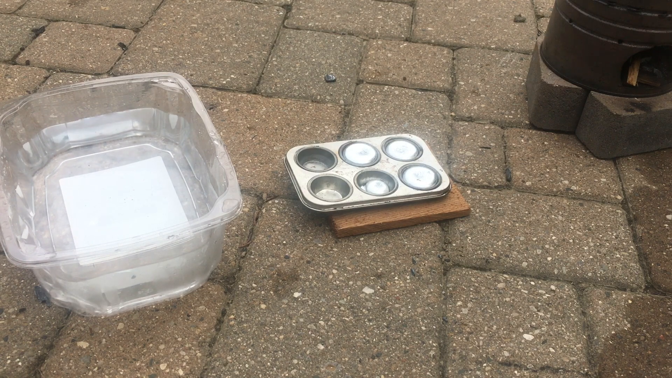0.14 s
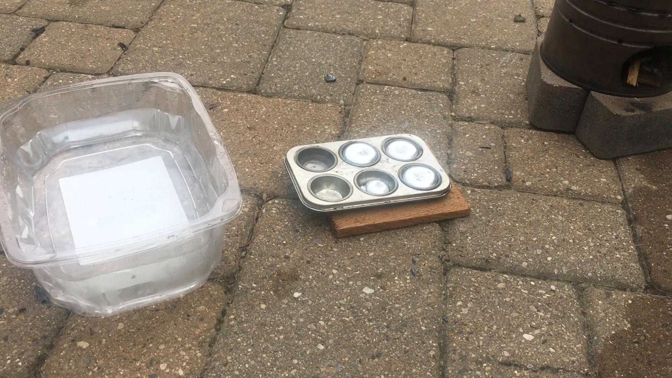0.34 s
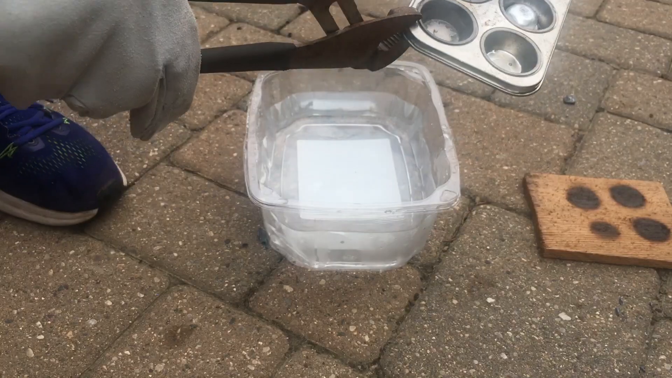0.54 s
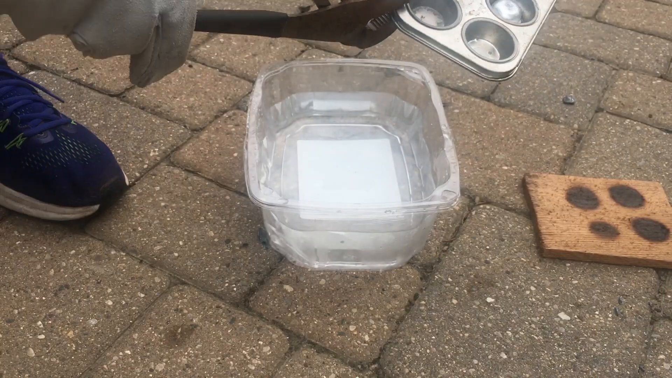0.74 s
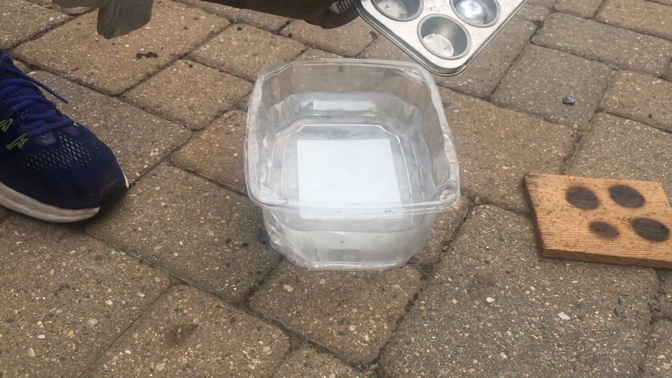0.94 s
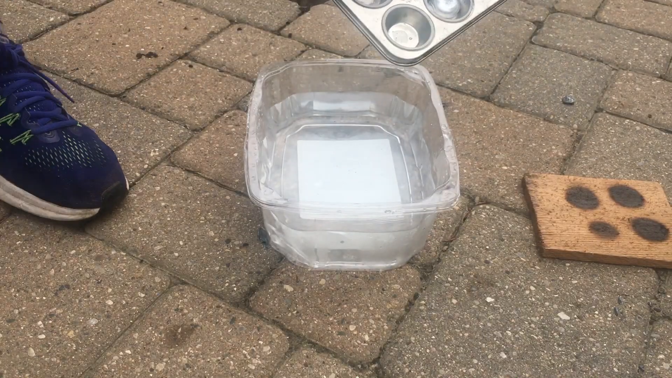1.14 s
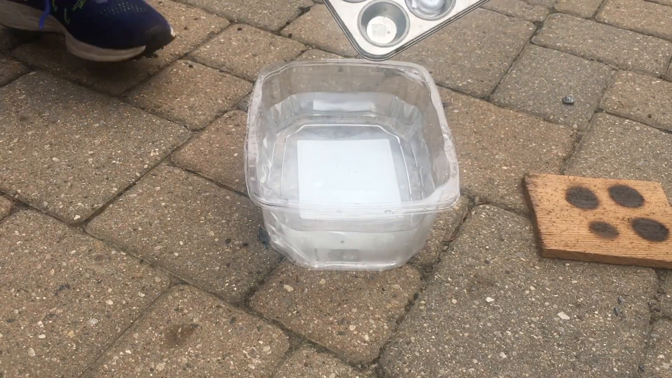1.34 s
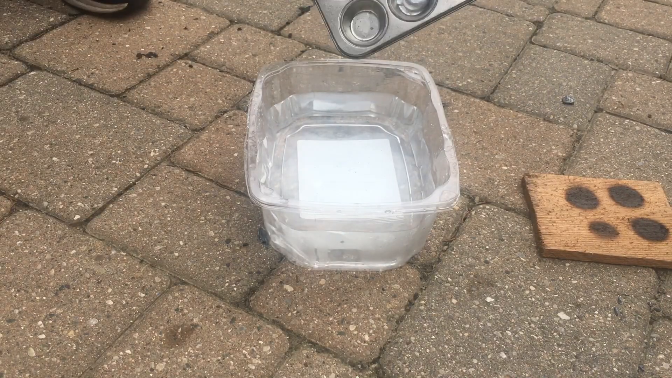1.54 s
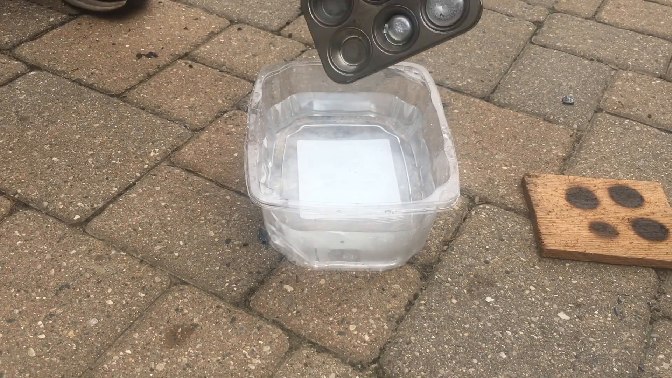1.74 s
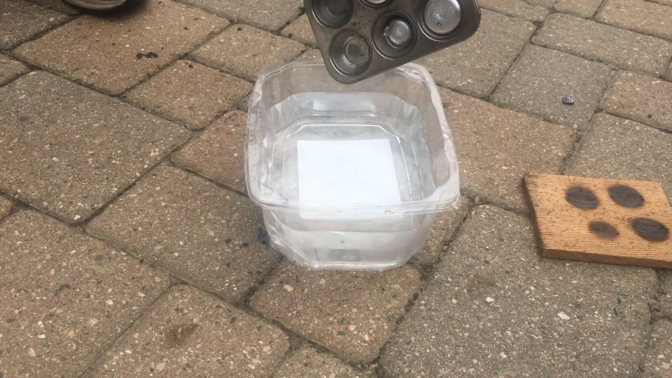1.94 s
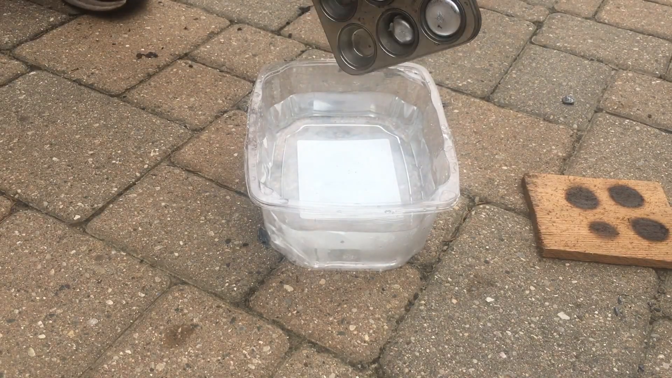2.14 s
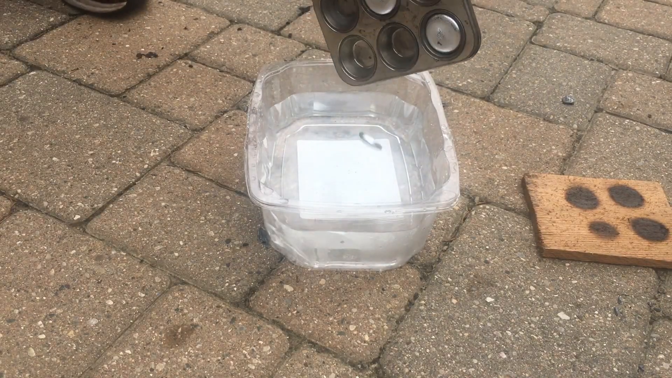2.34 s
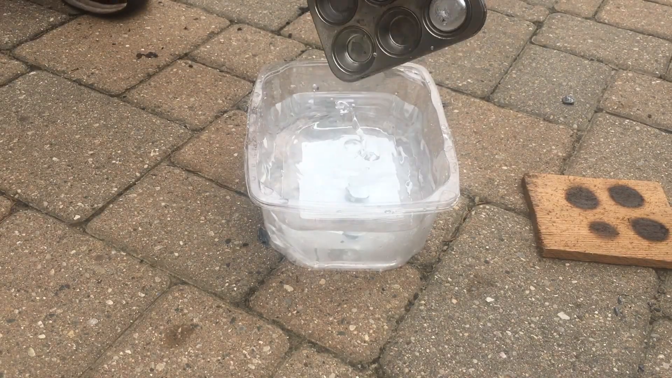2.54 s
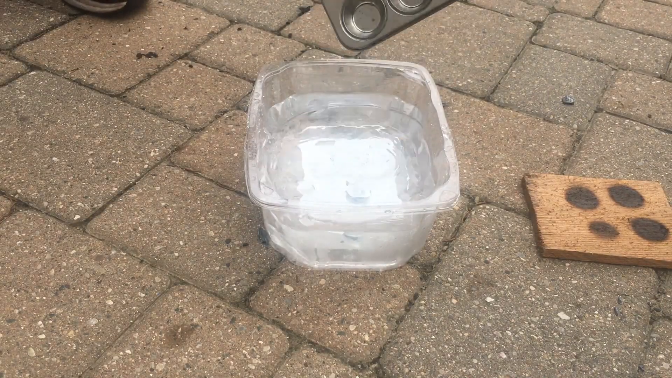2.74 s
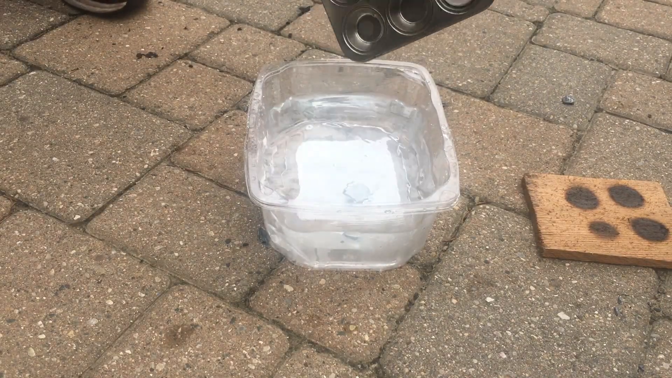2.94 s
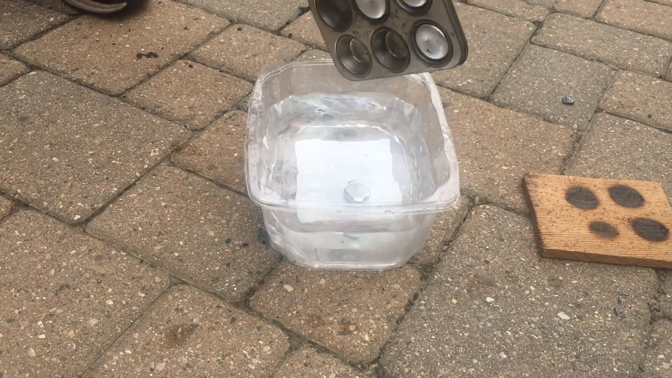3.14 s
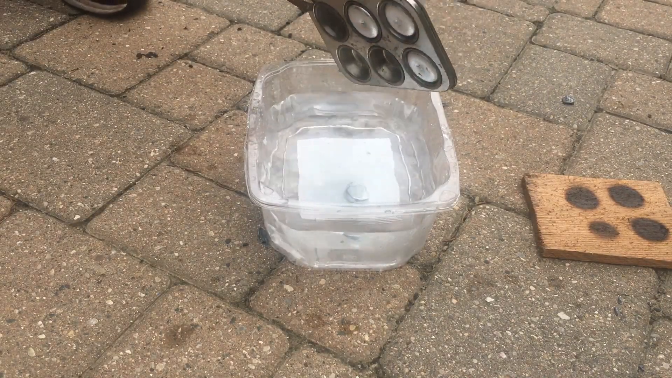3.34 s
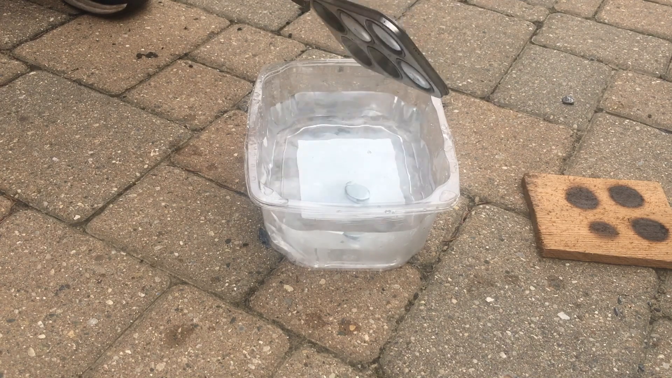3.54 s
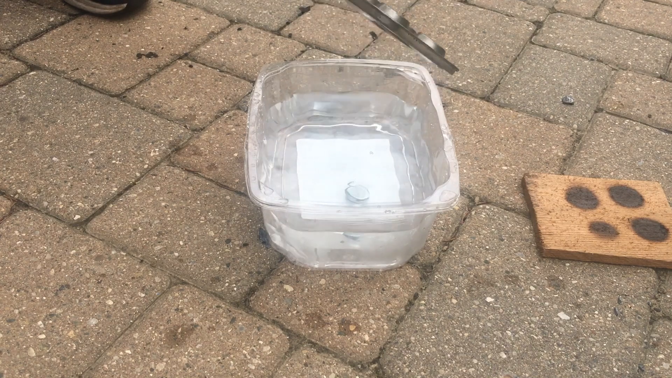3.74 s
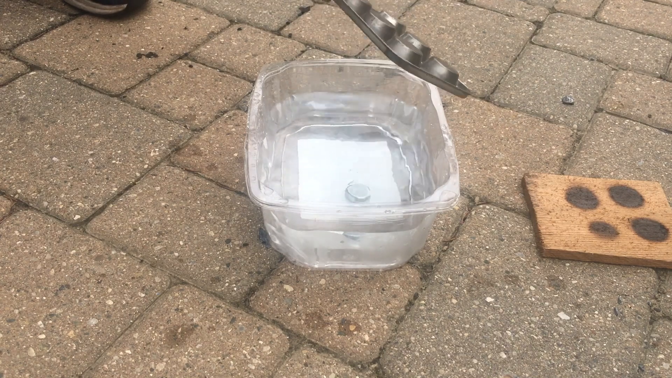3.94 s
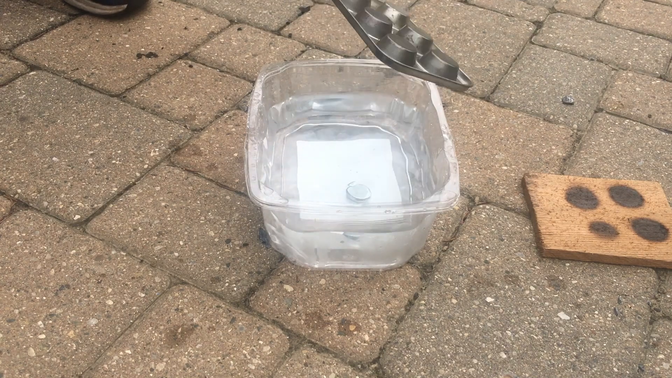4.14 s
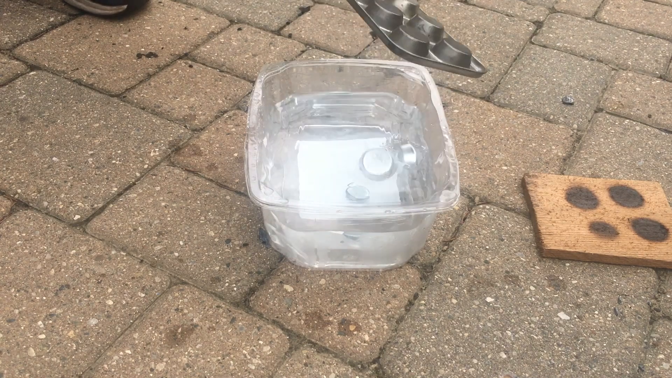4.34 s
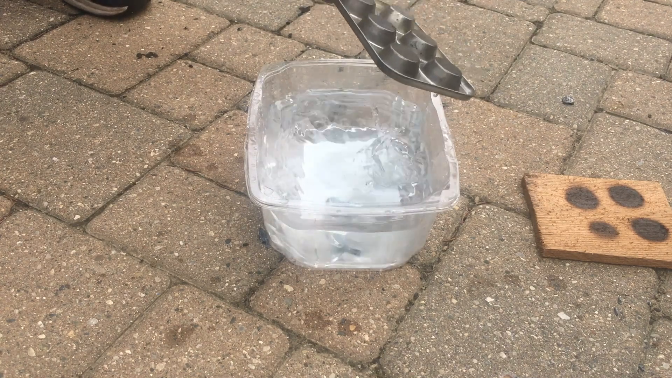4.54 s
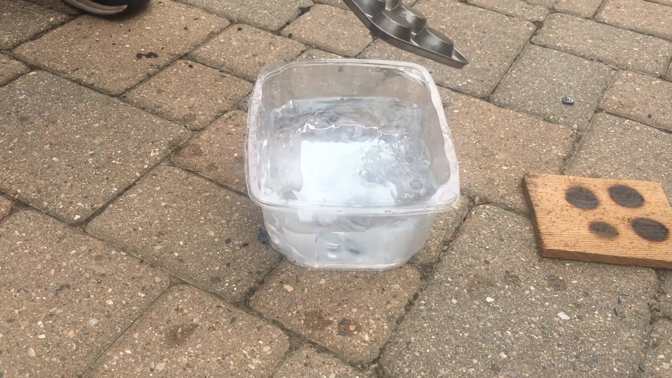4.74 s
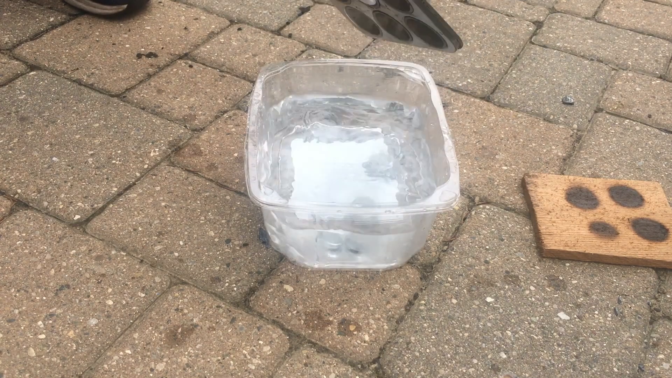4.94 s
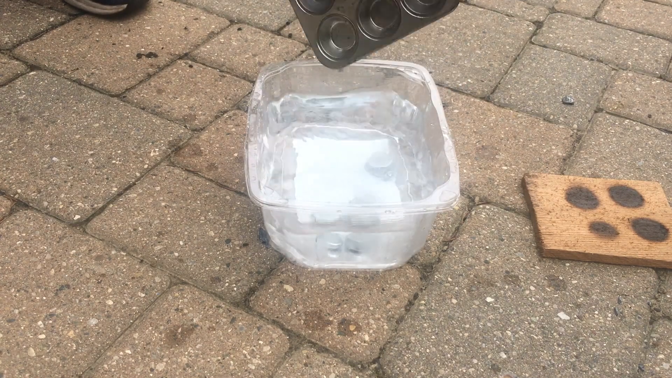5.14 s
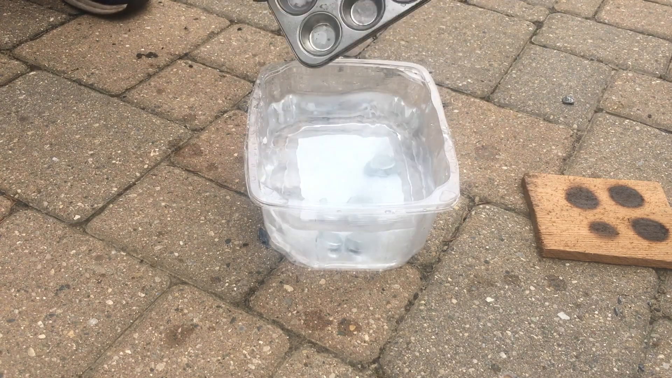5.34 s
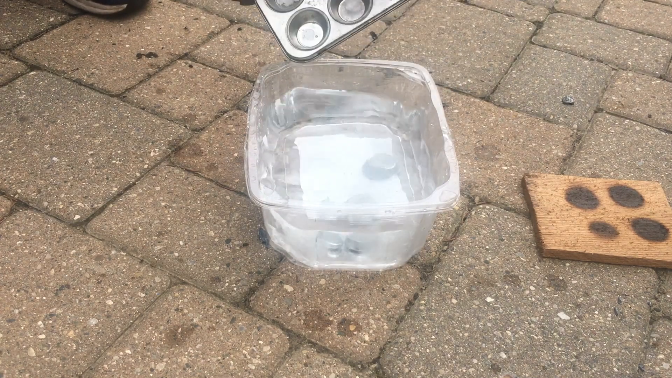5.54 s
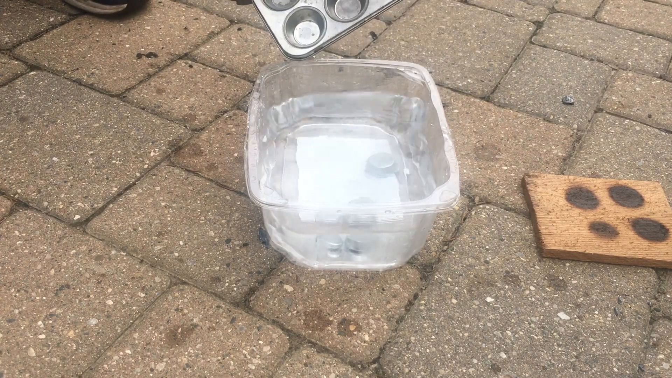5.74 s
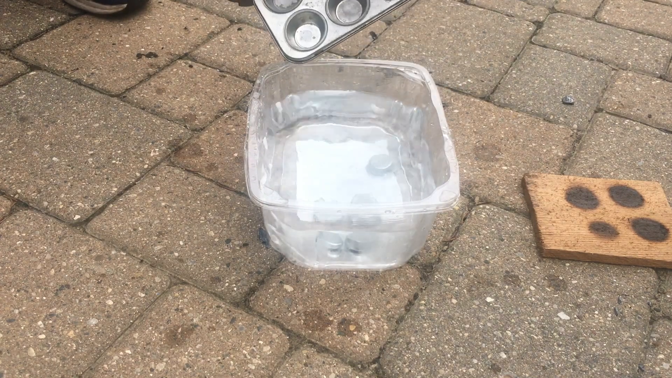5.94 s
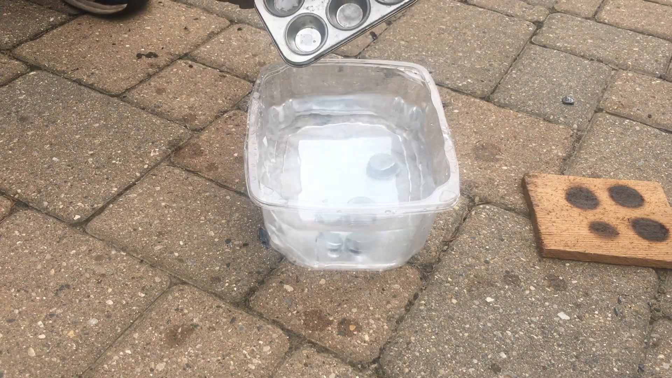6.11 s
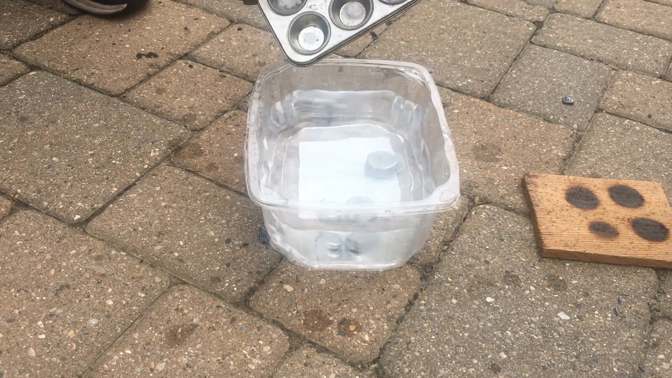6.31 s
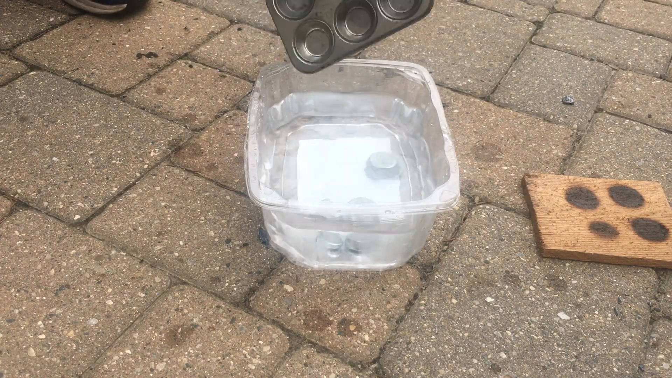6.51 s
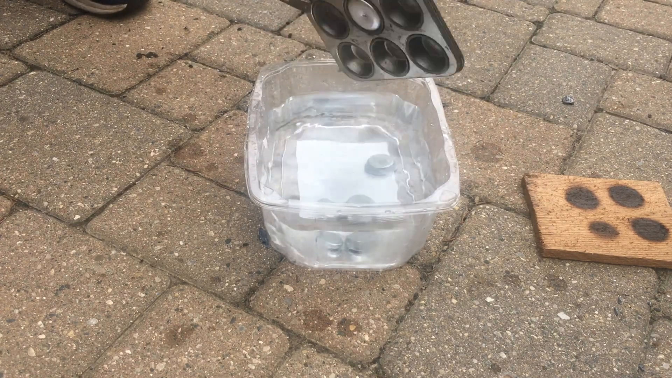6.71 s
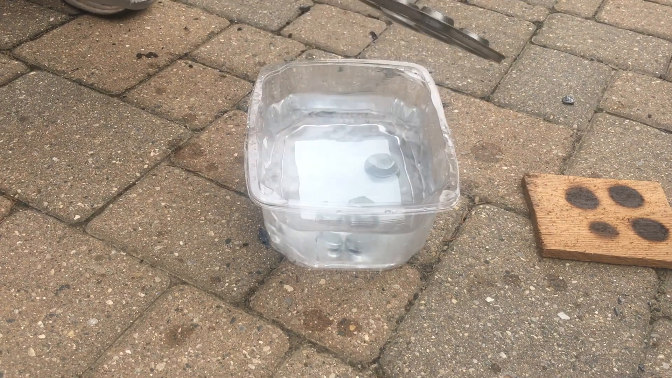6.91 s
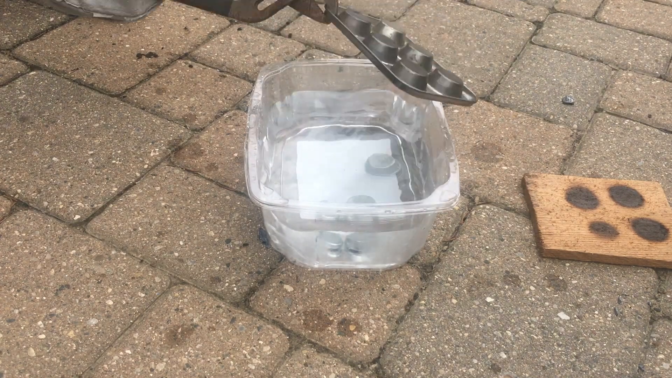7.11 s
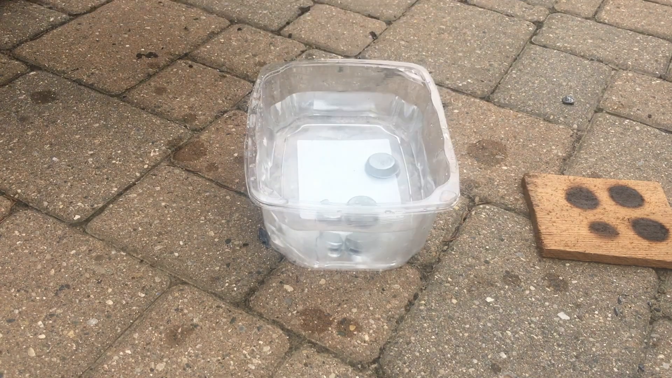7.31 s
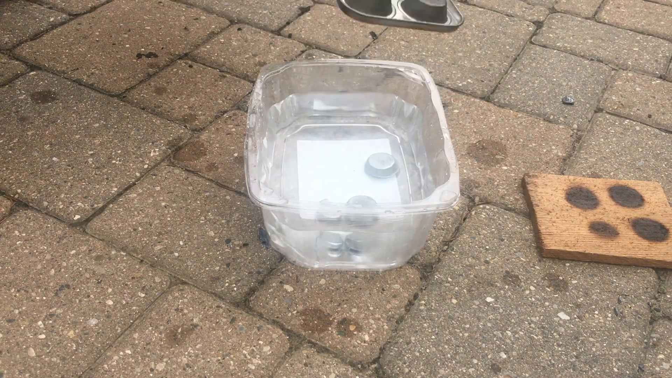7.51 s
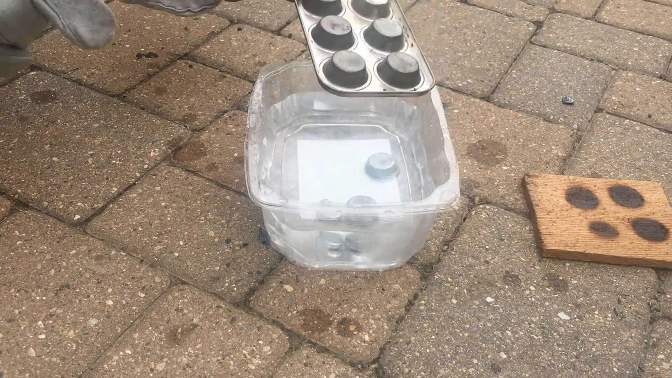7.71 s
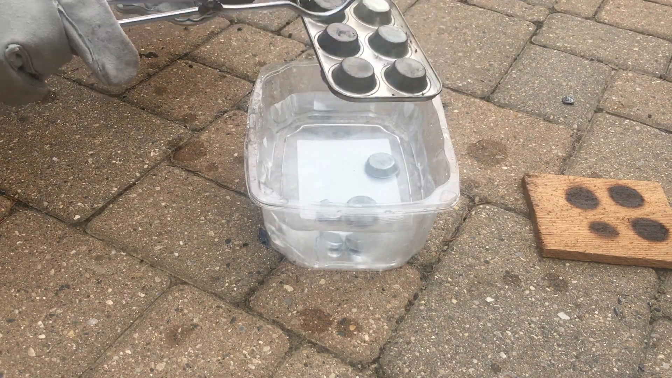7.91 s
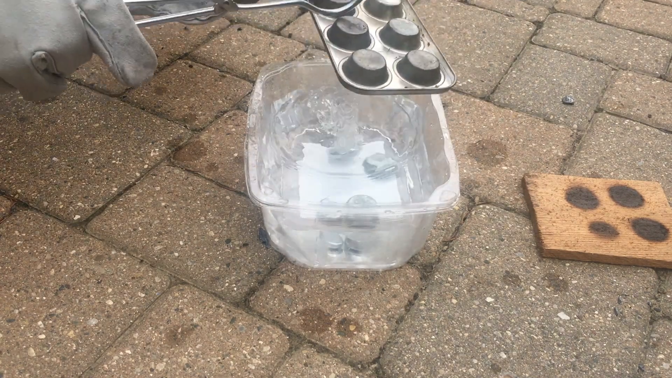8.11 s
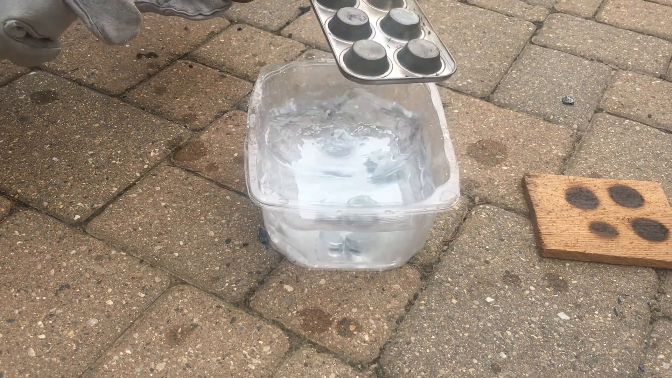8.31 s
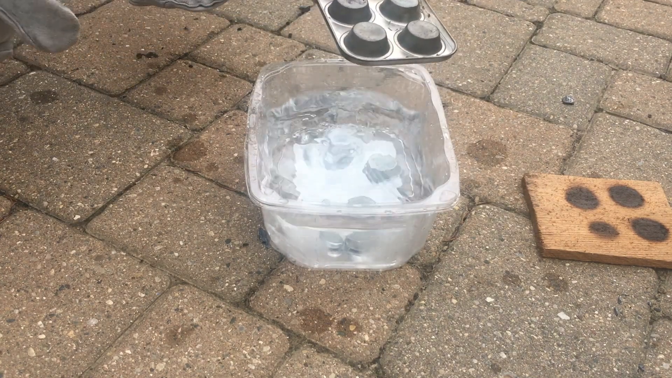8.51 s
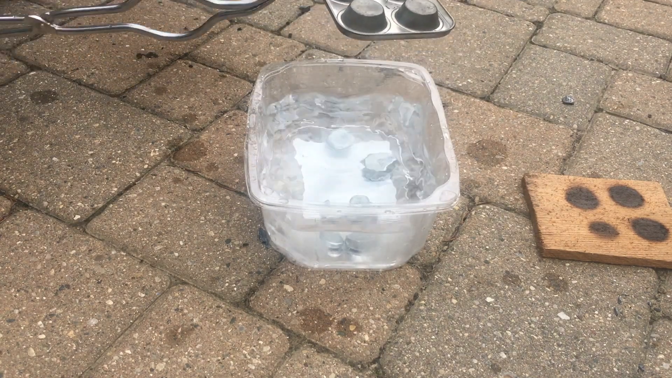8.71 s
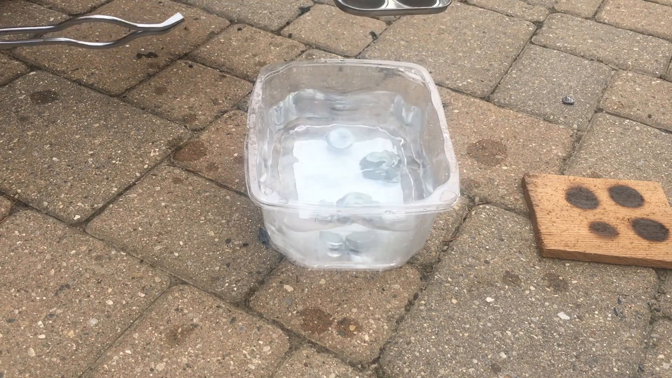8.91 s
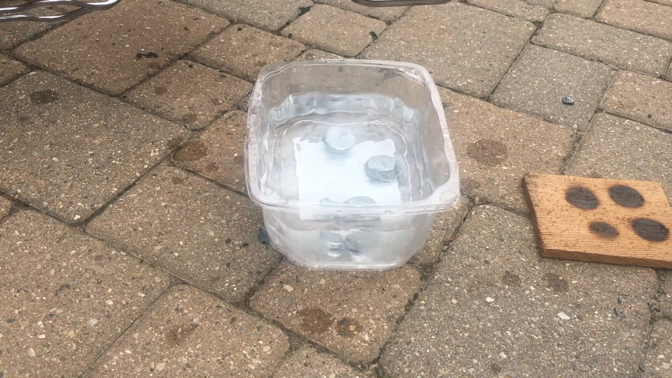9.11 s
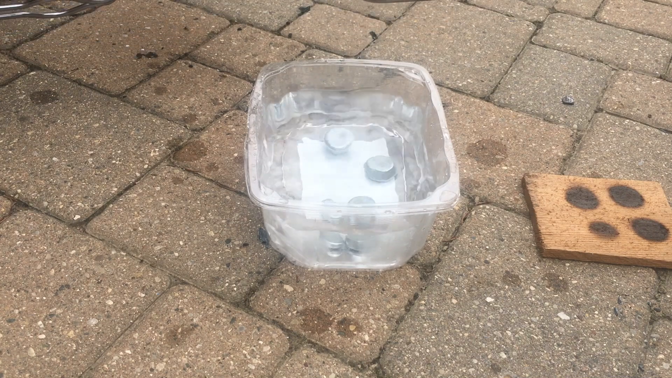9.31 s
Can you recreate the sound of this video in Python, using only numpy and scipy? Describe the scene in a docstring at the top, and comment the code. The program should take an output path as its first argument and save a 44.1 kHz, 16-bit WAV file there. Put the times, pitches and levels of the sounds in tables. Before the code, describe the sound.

Close outdoor sound on a paved patio, with low rumble slightly stronger for the first half second, a faint high insect shimmer and tiny bird chirps. Light scrape at 0.2 s, a faint tick at 0.8, metal clicks and rubs at 1.15-1.6. At 2.2 a thin scrape leads to a ringing pan clank at 2.35; an ingot meets water at 2.46 with a short hiss, two loud hollow pops, a small knock and drips until 2.9. Quiet follows. At 4.35 a cluster of pan knocks, then a sharper hiss at 4.43, strong pops and vigorous boiling, with raps up to 5.5 thinning into sputter that dies by 6.4. Pan knock at 6.63, then near quiet. A bright, loud clank at 7.95; at 8.1 a hiss, pop and hard clattering tub impact with plops and splash, then quickly fading fizz, small crackles around 9 and uneven ticking to about 9.46.

```python
"""Hot ingots into water

Three hot metal ingots are tipped out of a muffin pan into a plastic tub of water on a patio.
Slides and clanks are clicks and noise through pan modes; quench hiss is dense grains; pops are short decaying sines.
The second and third ingots go on boiling as random clicks rung through the tub or coloured bright.
Insects (narrow noise bands) and small bird notes (gliding sines) sound faintly over a low outdoor rumble."""
import sys
import numpy as np
from scipy import signal
from scipy.fft import rfft, irfft, next_fast_len
from scipy.io import wavfile

SR = 44100
rng = np.random.default_rng(int(sys.argv[2]) if len(sys.argv) > 2 else 0)


def to_wav(sig):
    """Store sig (one row per channel, or 1-D mono) as 16-bit WAV at the path in sys.argv[1].

    Samples outside -1..1 are clipped; the rate is SR.
    """
    pcm = np.clip(np.atleast_2d(sig), -1, 1) * 32767
    pcm = np.round(pcm).astype(np.int16)
    wavfile.write(sys.argv[1], SR, pcm.T)  # frames by channels


N = 417186
TIME = np.arange(N) / SR
SHORT = TIME[:SR // 4]  # time base of one short event, in seconds

# Dense, quickly damped part of a metal contact. Each row: frequency in Hz, relative level in dB.
CLANK_SPECTRUM = [(100, 7.5), (300, -12.5), (500, -5), (850, 0), (1400, 3.5), (2100, 0), (2900, -4),
                  (4000, -4), (5600, -8), (7700, -6.5), (10500, -14.5), (16000, -21)]
# Steam hiss, also the colour of splats and snaps. Each row: frequency in Hz, relative level in dB.
HISS_SPECTRUM = [(200, -6), (500, -10), (900, -3.5), (1300, -4), (2300, 4.5), (2800, -7), (3700, 4),
                 (5000, -2.5), (8500, 1), (12500, -2.5), (16000, -11.5)]
# Mid-range crackle of collapsing bubbles. Each row: frequency in Hz, relative level in dB.
CRACKLE_SPECTRUM = [(1500, 0), (2200, 8.5), (2800, 9.5), (3600, 3.5), (4200, 8.5), (4900, -52)]
# Fine treble fizz of the smallest bubbles. Each row: frequency in Hz, relative level in dB.
FIZZ_SPECTRUM = [(3500, 8.5), (4800, -3.5), (6500, 0), (9300, -1), (10400, -5), (12300, -1), (14000, -10),
                 (16000, -16)]


def from_db(db):
    """Decibels to gain."""
    return 10 ** (np.asarray(db) / 20)


def rms_one(x):
    """Scale to rms 1."""
    return x / np.sqrt(np.mean(x ** 2) + 1e-20)


def peak_one(x):
    """Scale to peak 1."""
    return x / (np.abs(x).max() + 1e-20)


def short_noise():
    """White noise as long as one short event."""
    return rng.standard_normal(len(SHORT))


def add(out, s, sound):
    """Mix a sound in at time s."""
    at = max(round(s * SR), 0)
    out[at:at + len(sound)] += sound[:N - at]


def level(rows):
    """Gain over time from a curve of (s, dB)."""
    return from_db(np.interp(TIME, *np.transpose(rows)))


def during(start, end, fade_s=0.021):
    """1 from start to end, fading to 0 on both sides."""
    edges = [start - 2 * fade_s, start - fade_s, end, end + 2 * fade_s]
    return np.interp(TIME, edges, [0, 1, 1, 0])


def waver(step_s, depth_db):
    """A gain that wanders at random."""
    wander = rng.standard_normal(N // 100)
    return from_db(depth_db * np.interp(TIME / step_s, np.arange(N // 100), wander))


def colour(x, spectrum, tilt_db=0):
    """Give x a spectrum, tilted by some dB per octave; rms 1."""
    size = next_fast_len(len(x))
    hz, db = np.transpose(spectrum)
    octave = np.log2(np.maximum(np.fft.rfftfreq(size, 1 / SR), 1))
    beyond = octave - np.clip(octave, np.log2(hz[0]), np.log2(hz[-1]))
    # outside the table the level falls by another 30 dB per octave
    shape_db = np.interp(octave, np.log2(hz), db) + tilt_db * octave - 30 * np.abs(beyond)
    return rms_one(irfft(rfft(x, size) * from_db(shape_db), size)[:len(x)])


def resonate(x, hz, width):
    """One resonance with gain 1 at its top."""
    r = np.exp(-np.pi * width / SR)
    zeros = np.array([1, 0, -1]) * (1 - r * r) / 2
    poles = [1, -2 * r * np.cos(2 * np.pi * hz / SR), r * r]
    return signal.lfilter(zeros, poles, x + 1e-18)


def high_pass(x, hz):
    """Second-order low cut."""
    return signal.sosfilt(signal.butter(2, hz, "high", fs=SR, output="sos"), x)


def dying(t60):
    """Exponential decay by 60 dB in t60 seconds."""
    return from_db(-60 * SHORT / max(t60, .001))


def ringing(modes, spread_db=3.5):
    """Struck modes as dying sines, each with a chance strength and sign."""
    out = np.zeros(len(SHORT))
    for hz, db, t60 in modes:
        strength = rng.choice([-1, 1]) * from_db(db + spread_db * rng.normal())
        out += strength * dying(t60) * np.sin(2 * np.pi * hz * SHORT)
    return out


def grains(size, per_s, spread_db):
    """Random clicks of uneven strength."""
    strength = from_db(spread_db * np.minimum(rng.exponential(1, size), 4)) * rng.choice([-1, 1], size)
    return strength * (rng.random(size) < per_s / SR)


def stroke(length, start_db, end_db, release_s):
    """A quick start, a steady change of level and a short release."""
    body = from_db(np.interp(SHORT, [0, max(length, .002)], [start_db, end_db]))
    return body * np.minimum(SHORT / .0007, 1) * np.exp(-np.maximum(SHORT - length, 0) / release_s)


def garden():
    """Shaped noise makes low rumble, hush and a shrill insect chorus; gliding sines make faint bird notes."""
    # Outdoor rumble. Each row: frequency in Hz, relative level in dB.
    rumble_spectrum = [(25, -22), (38, -12), (52, 1), (75, -4), (115, -2.5), (160, -9.5), (230, -16),
                       (350, -24.5), (500, -39.5)]
    # Rumble level, stronger in the first half second. Each row: time in seconds, level in dB.
    rumble_level = [(0, -42.5), (.49, -46), (.54, -55), (7.33, -54), (7.42, -59.5), (9.46, -57)]
    # Background hush, perhaps with sloshing water towards the end. Each row: frequency in Hz, relative level in dB.
    hush_spectrum = [(150, -8), (300, 3), (600, -1.5), (1100, -5), (2000, -11), (4000, -17), (7000, -19),
                     (9500, -26), (11000, -24.5), (16000, -25)]
    # Hush level, swelling towards the end. Each row: time in seconds, level in dB.
    hush_level = [(0, -61), (.5, -62.5), (.52, -65.5), (2, -67), (3.5, -68), (7.38, -67), (7.45, -73),
                  (9.46, -59.5)]
    # Insect bands. Each row: centre in Hz, width in Hz, level in dB, waver in dB.
    insects = [(2070, 130, -84, 2), (5130, 380, -78, 2), (8330, 780, -70, .4)]
    # Bird notes. Each row: start in seconds, peak in dB, length in seconds, start pitch and end pitch in Hz.
    chirps = [(0, -54.5, 0.07, 6100, 7740), (0.36, -59, 0.053, 7340, 8300),
              (1.014, -59.5, 0.064, 6160, 7700), (4.085, -69.5, 0.088, 3310, 3230),
              (7.165, -69.5, .05, 6600, 7660), (7.555, -72, 0.045, 6550, 6910)]
    out = level(rumble_level) * colour(rng.standard_normal(N), rumble_spectrum)
    out += level(hush_level) * colour(rng.standard_normal(N), hush_spectrum)
    for hz, width, db, waver_db in insects:
        band = resonate(resonate(rng.standard_normal(N), hz, width), hz, width)
        out += from_db(db) * waver(step_s=0.055, depth_db=waver_db) * rms_one(band)
    for s, db, length, start_hz, end_hz in chirps:
        roughness = 1 + 0.026 * colour(short_noise(), [(50, 0), (300, 0)])
        pitch_hz = np.interp(SHORT, [0, length], [start_hz, end_hz]) * roughness
        swell = np.interp(SHORT, [0, length / 2, length], [0, 1, 0])
        add(out, s, from_db(db) * np.sin(2 * np.pi * np.cumsum(pitch_hz) / SR) * swell)
    return out


def pan_ring(s, lead_hz, lead_db=12.0, width_octaves=.08):
    """The pan's modes at time s; the point of contact drives those near one frequency hardest."""
    # Pan modes. Each row: frequency in Hz before the pitch factor, relative level in dB, t60 in seconds.
    pan_modes = [(1190, -15, .1), (1865, -7, .12), (2430, -12, .12), (2720, -3, .055), (2945, -9, .08),
                 (3250, -9, .08), (3785, -14, .14), (4230, -6, .09), (4535, -13, .11), (5400, -15, .07),
                 (6550, -5, .045), (6780, -6, .04), (7960, -9, .07), (9090, -7, .07), (10900, -21, .06),
                 (13000, -18, .05), (13750, -16, .09)]
    # The pan rings higher as it empties. Each row: time in seconds, pitch factor.
    pan_pitch = [(3, 1), (4.3, 1.01), (6.6, 1.03), (7, 1.03), (7.9, 1.138)]
    pitch = np.interp(s, *np.transpose(pan_pitch))
    driven = []
    for hz, db, t60 in pan_modes:
        near = np.exp(-(np.log2(hz * pitch / lead_hz) / width_octaves) ** 2)
        driven.append((hz * pitch, db + lead_db * near, t60))
    return ringing(driven)


def scrapes():
    """Metal rubs on the pan: dense stick-slip clicks, heard directly and sung by the pan's modes."""
    out = np.zeros(N)
    # Each row: start and end in seconds, start level and end level in dB, brightness in dB per octave,
    # ring relative to the rub in dB.
    rubs = [(0.219, 0.307, -42, -53, -6.5, -28), (1.251, 1.305, -59, -41.5, 0.5, -35),
            (1.301, 1.355, -45, -47, -2.5, -12), (1.551, 1.613, -45.5, -59, -1.5, -29),
            (2.209, 2.292, -65.5, -53.5, 0, 2), (2.284, 2.35, -59, -53.5, -0.5, -1),
            (6.655, 6.719, -63, -74, 2, -11.5)]
    for start, end, start_db, end_db, tilt_db, ring_db in rubs:
        slips = grains(len(SHORT), per_s=5000, spread_db=5.0)
        ring = pan_ring(start, lead_hz=1844, lead_db=14.5)
        sung = rms_one(signal.fftconvolve(slips, ring)[:len(SHORT)])
        rub = colour(slips, CLANK_SPECTRUM, tilt_db) + from_db(ring_db) * sung
        add(out, start, rub * stroke(end - start, start_db, end_db, release_s=0.0048))
    return out


def clank(tilt_db, t60, crest_db=7.0, crack_db=-9.0):
    """A sharp crack, then the crowded, quickly dying modes of a hard contact, as coloured noise."""
    decay = dying(t60) + from_db(crack_db) * dying(0.0031)
    return from_db(-crest_db) * colour(short_noise(), CLANK_SPECTRUM, tilt_db) * decay


def knocks(focus_db=3.0):
    """Ingots and tongs strike the thin pan: a clank focused by the point of contact, plus ringing modes."""
    out = np.zeros(N)
    # Each row: start in seconds, level in dB, brightness in dB per octave, ring in dB before it is halved,
    # frequency in Hz that the point of contact favours.
    strikes = [(.835, -48.5, 2, -17, 1880), (1.153, -29, -4, -19, 1190), (1.2986, -40, 3, -27, 1865),
               (1.345, -28, -7.5, -32, 1865), (2.3499, -16, 1, -10, 3000), (2.3649, -25, 0, -7, 1870),
               (4.340, -22, 3, -32, 2420), (4.349, -25, -3, -24, 2430), (4.3595, -18.5, -2.5, -13.5, 2600),
               (4.365, -20.5, -1.5, -6.5, 4560), (6.632, -24, .5, -25, 1820), (6.634, -23, -5.5, -34, 730),
               (7.9465, -11, 5.5, -22, 7960), (7.9495, -17, -1, -9.5, 4330)]
    usual_t60_s, usual_db, t60_doubles_db = 0.034, -22, 29  # harder knocks take longer to die
    for s, db, tilt_db, ring_db, lead_hz in strikes:
        hit = clank(tilt_db, usual_t60_s * 2 ** ((db - usual_db) / t60_doubles_db))
        hit = hit + from_db(focus_db) * resonate(hit, lead_hz, width=0.26 * lead_hz)
        add(out, s, from_db(db) * (hit + from_db(ring_db) * pan_ring(s, lead_hz) / 2))
    return out


def pan():
    """All contact on the thin pan, with little sound below its lowest range."""
    return high_pass(knocks() + scrapes(), 260)


def steam(low_hz, tilt_db):
    """A crackling hiss of flashing steam above some frequency; rms 1."""
    flashes = grains(len(SHORT), per_s=29000, spread_db=4.0)
    return rms_one(high_pass(colour(flashes, HISS_SPECTRUM, tilt_db), low_hz))


def quenches():
    """Water flashes to steam until the ingot is under the surface: thin at first touch, fuller as it sinks."""
    out = np.zeros(N)
    # Each row: start, swell and length in seconds, start, top and end level in dB, brightness in dB per octave.
    touches = [(2.463, .016, .072, -31.5, -29.5, -37.5, -2.5), (4.4333, 0.0031, .02, -22, -24, -42.5, 1),
               (4.450, .012, 0.111, -21, -19, -29.5, 1.5), (8.093, 0.011, 0.14, -33.5, -29.5, -40.5, 1.5)]
    # as it sinks the hiss reaches lower and dulls (tilt in dB per octave)
    sink_s, surface_hz, sunk_hz, sunk_tilt_db = 0.071, 1900, 457, -2.5
    for start, swell, length, start_db, top_db, end_db, tilt_db in touches:
        depth = np.minimum(SHORT / sink_s, 1) ** 2
        thin = np.sqrt(1 - depth ** 2) * steam(surface_hz, tilt_db)
        full = depth * steam(sunk_hz, tilt_db + sunk_tilt_db)
        flow = from_db(np.interp(SHORT, [0, swell, length], [start_db, top_db, end_db]))
        add(out, start, (thin + full) * flow * stroke(length, 0, 0, release_s=.003))
    return out


def tub(x):
    """The resonances of the tub and its water, in alternating polarity."""
    # Each row: frequency in Hz, width in Hz, relative level in dB.
    tub_modes = [(295, 166, -8.5), (747, 320, -5.5), (900, 140, -1), (1285, 170, 1), (1491, 210, -1),
                 (1688, 180, 0.5), (2170, 290, -7), (2510, 150, -6), (3336, 170, -9), (3780, 310, -11.5)]
    out = np.zeros(len(x))
    for k, (hz, width, db) in enumerate(tub_modes):
        out += (-1) ** k * from_db(db) * resonate(x, hz, width)
    return out


def pops(tub_db=-14.5, snap_db=-14.5, snap_hz=4200, snap_db_per_octave=16):
    """A collapsing steam pocket gives a few strong cycles and a snap, crisper for small pockets, and shakes the tub."""
    out = np.zeros(N)
    # Large steam pockets. Each row: start in seconds, peak in dB, pitch in Hz, t60 in seconds.
    pockets = [(2.484, -23.5, 2200, 0.062), (2.5025, -5.5, 1760, .011), (2.511, -8.5, 1734, 0.015),
               (2.527, -22.5, 2310, .009), (4.4638, -13, 2120, 0.013), (4.491, -3.5, 1490, 0.0041),
               (4.505, -13.5, 1290, 0.0028), (4.7457, -15.5, 1270, 0.011), (4.7724, -11.5, 1280, 0.0053),
               (4.7837, -11, 1200, 0.0074), (4.8007, -15, 1300, .0086), (8.136, -18.5, 1316, 0.021),
               (8.141, -7.5, 2150, 0.0022)]
    usual_hz = 1450
    for s, db, hz, t60 in pockets:
        pulse = peak_one(np.sin(2 * np.pi * hz * SHORT) * dying(t60) * (1 - np.exp(-SHORT / 0.00024)))
        shake = peak_one(tub(short_noise() * dying(0.066)))
        snap = peak_one(resonate(short_noise() * dying(0.0073), snap_hz, width=2700))
        crisp_db = snap_db + snap_db_per_octave * min(np.log2(hz / usual_hz), .4)
        pop = pulse + from_db(tub_db) * shake + from_db(crisp_db) * snap
        add(out, s, from_db(db) * peak_one(pop))
    return out


def splashing():
    """Water churns in the tub as dense clicks through its modes; fine spray patters back as sparse ones."""
    # Droplets falling back. Each row: time in seconds, level in dB.
    spray = [(2.53, -65), (2.62, -72), (2.78, -78), (2.9, -84.5)]
    # Swells of churning water. Each row: start and end in seconds, level in dB.
    swells = [(2.546, 2.694, -60), (2.658, 2.68, -47), (4.534, 4.563, -34), (4.712, 4.73, -33.5),
              (4.788, 4.817, -29.5), (4.957, 4.968, -29), (5.222, 5.237, -33.5), (8.954, 9.049, -44)]
    patter = colour(grains(N, per_s=64, spread_db=3.0), HISS_SPECTRUM, tilt_db=-0.5)
    out = level(spray) * during(spray[0][0], spray[-1][0]) * patter
    for start, end, db in swells:
        churn = rms_one(tub(grains(len(SHORT), per_s=3000, spread_db=7.0)))
        add(out, start, churn * stroke(end - start, db, db, release_s=0.0023))
    return out


def tub_impacts():
    """A thing drops into the tub: a dull splashing knock, then later two ingot clanks with their ringing modes."""
    out = np.zeros(N)
    # Each row: start in seconds, level in dB, ring relative to that level in dB (faint in the first).
    impacts = [(2.649, -29, -26), (8.1689, -8, -6), (8.176, -12, -8)]
    # Ringing modes. Each row: frequency in Hz, relative level in dB, t60 in seconds.
    impact_modes = [(284, -16.5, 0.085), (1500, -11, 0.033), (3150, -3, 0.033), (3430, 2.5, 0.019),
                    (3720, -9, 0.048), (4940, -16.5, 0.15), (13730, -2, 0.031)]
    for s, db, ring_db in impacts:
        hit = clank(tilt_db=0.8, t60=0.019)
        add(out, s, from_db(db) * (hit + from_db(ring_db) * ringing(impact_modes)))
    return out


def drops():
    """A drop splats on the surface; the air it traps rings and rises in pitch."""
    out = np.zeros(N)
    # Each row: start in seconds, bubble level in dB, starting pitch in Hz, splat relative to that level in dB.
    plops = [(2.665, -39, 1300, -6), (2.671, -38, 660, -12), (2.72, -44, 3630, -4), (2.737, -40, 3630, 3.5),
             (2.762, -42, 2170, -3), (4.618, -28.5, 404, -15), (8.207, -17, 704, 1), (8.223, -26, 1370, -8),
             (8.232, -27, 1900, -1)]
    t60_s, rise_octaves_per_s = 0.023, 18
    for s, db, hz, splat_db in plops:
        pitch_hz = hz * 2 ** (rise_octaves_per_s * np.minimum(SHORT, t60_s))
        tone = np.sin(2 * np.pi * np.cumsum(pitch_hz) / SR)
        bubble = tone * dying(t60_s) * np.minimum(SHORT / 0.00047, 1)
        splat = peak_one(colour(short_noise(), HISS_SPECTRUM) * dying(0.018))
        add(out, s, from_db(db) * (bubble + from_db(splat_db) * splat))
    return out


def boil(ingot, per_s, surge_db):
    """Steam bubbles collapse in surges on the sunken metal, ever fewer as it cools: simmer, crackle, fine fizz."""
    simmer_follows, crackle_follows = 0.79, 1.61  # their fall in dB as a share of the fizz's
    give_out_s, give_out_db = .9, 9  # the boil gives out over its last moments, ever faster
    start, end, simmer_db, crackle_db, fizz_db, cooling_db_per_s, settle_s = ingot
    age = np.clip(TIME, start, end) - start
    spent = np.interp(TIME, [end - give_out_s, end], [0, 1]) ** 1.5
    cooling_db = cooling_db_per_s * settle_s * np.expm1(-age / settle_s)
    heat = from_db(cooling_db - give_out_db * spent)
    rocking = waver(step_s=.06, depth_db=1.0)  # swells and sinks as the water rocks
    # fewer collapses each stand out more
    surge = rocking * waver(step_s=.012, depth_db=surge_db) / np.sqrt(heat)
    collapses = surge * grains(N, per_s * heat, spread_db=3.0)
    tiny = surge * grains(N, 22000 * heat, spread_db=4.0)
    simmer = from_db(simmer_db) * heat ** simmer_follows * rms_one(tub(collapses))
    crackle = from_db(crackle_db) * heat ** crackle_follows * colour(collapses, CRACKLE_SPECTRUM)
    fizz = from_db(fizz_db) * heat * colour(tiny, FIZZ_SPECTRUM)
    return (simmer + crackle + fizz) * during(start, end)


def raps(ingot):
    """The loud collapses during one ingot's boil, which rap the tub."""
    # Each row: time in seconds before the sputter's short delay, peak in dB.
    loud = [(4.953, -16.5), (5.11, -23), (5.217, -20.5), (5.309, -27.5), (5.404, -19.5), (5.485, -20.5),
            (5.576, -29), (5.608, -27), (5.7, -29), (5.767, -27), (5.783, -24.5), (5.853, -31),
            (5.897, -30.5), (5.94, -26.5), (6.077, -30), (8.959, -33), (8.99, -27), (9.01, -29.5),
            (9.355, -38.5), (9.408, -36.5)]
    start, end = ingot[:2]
    return [(s, db) for s, db in loud if start < s < end]


def dying_sputter():
    """Rows (s, peak dB) of collapses at uneven gaps, fading slowly at first and then fast."""
    start_s, end_s, gap_s = 5.28, 6.36, .029
    start_db, fade_db, spread_db = -29, 15.5, 2.0
    times = np.arange(start_s, end_s, gap_s)
    early, luck = rng.standard_normal((len(times), 2)).T
    progress = (times - start_s) / (end_s - start_s)
    peaks_db = start_db - fade_db * progress ** 2 + spread_db * luck
    return list(zip(times + .3 * gap_s * early, peaks_db))


def sputter(rows, cluster_db, cluster_t60, snap_db, snap_tilt_db, delay_s):
    """Each collapse is a sharp click into the tub, trailed by tiny ones; the small collapses snap most crisply."""
    out = np.zeros(N)
    usual_db = np.median(np.array(rows)[:, 1])
    for s, db in rows:
        clicks = from_db(cluster_db) * short_noise() * dying(cluster_t60)
        clicks[0] += 1
        rap = signal.sosfilt(signal.butter(2, 5500, fs=SR, output="sos"), tub(clicks))
        snap = peak_one(colour(short_noise(), HISS_SPECTRUM, snap_tilt_db) * dying(0.019))
        crisp = from_db(snap_db - .5 * (db - usual_db))
        add(out, s + delay_s, from_db(db) * peak_one(peak_one(rap) + crisp * snap))
    return out


def ticking(per_s=80, snap_db=-2.0):
    """The third ingot's steam film breaks: single collapses follow each other quickly and unevenly."""
    # Each row: time in seconds, level in dB.
    tick_level = [(9.06, -58), (9.2, -52.5), (9.45, -58)]
    ticks = grains(N, per_s, spread_db=1.0)
    body = rms_one(tub(ticks)) + colour(ticks, CRACKLE_SPECTRUM)
    body = body + from_db(snap_db) * colour(ticks, FIZZ_SPECTRUM)
    return level(tick_level) * during(tick_level[0][0], tick_level[-1][0]) * rms_one(body)


def patio(x, wet_db=-21.0, t60=0.19):
    """A weak, short scatter of echoes from paving and walls."""
    echo_spectrum = [(150, 7.0), (2000, -6.0), (8000, -8), (16000, -12.5)]  # Hz, relative dB
    echoes = colour(grains(len(SHORT), per_s=2500, spread_db=0.5), echo_spectrum)
    echoes = echoes * dying(t60) * np.minimum(SHORT / .008, 1)
    return x + from_db(wet_db) * signal.fftconvolve(x, echoes / np.linalg.norm(echoes))[:N]


def scene():
    """Pan and tub close by, the garden behind."""
    # Boiling round a sunken ingot, second then third. Each row: start and end in seconds,
    # simmer, crackle and fizz in dB before cooling, first cooling rate in dB per second, settling time in seconds.
    boils = [(4.575, 6.38, -35.5, -45.5, -42.5, 15, 8.9), (8.25, 10.4, -47.5, -44.5, -49, 28, 0.49)]
    second = boil(boils[0], per_s=9000, surge_db=2.3)
    second += sputter(raps(boils[0]) + dying_sputter(), cluster_db=-19, cluster_t60=0.019,
                      snap_db=-8.5, snap_tilt_db=-4.0, delay_s=0.0006)
    third = boil(boils[1], per_s=9000, surge_db=1.9)
    third += sputter(raps(boils[1]), cluster_db=-18, cluster_t60=0.0058,
                     snap_db=5.5, snap_tilt_db=-2.5, delay_s=.0006)
    water = quenches() + pops() + splashing() + drops() + second + third + ticking()
    return (patio(pan() + tub_impacts() + water) + garden())[None]


def record(dry):
    """The microphone drops the deepest bass; the top is cut steeply at 16 kHz."""
    top_cut = signal.ellip(10, .1, 80, 16000, fs=SR, output="sos")
    return signal.sosfilt(top_cut, high_pass(dry, 38))


dry = scene()
out = record(dry)
to_wav(out)
```